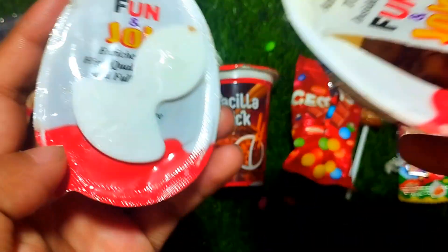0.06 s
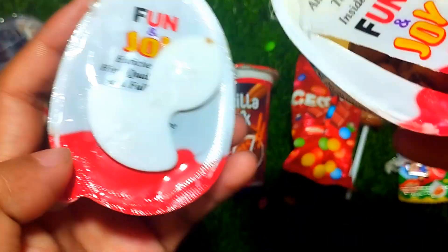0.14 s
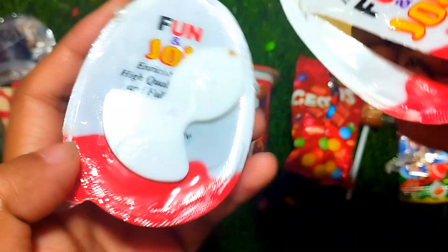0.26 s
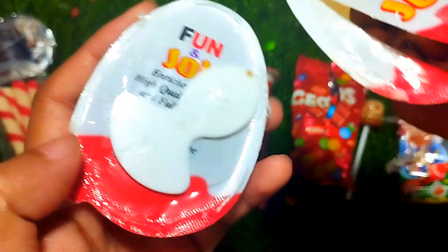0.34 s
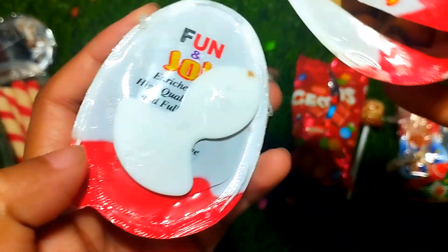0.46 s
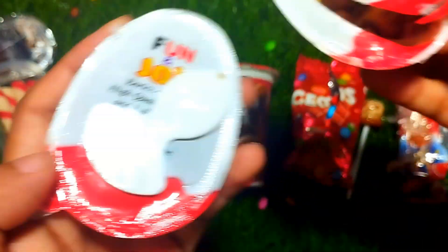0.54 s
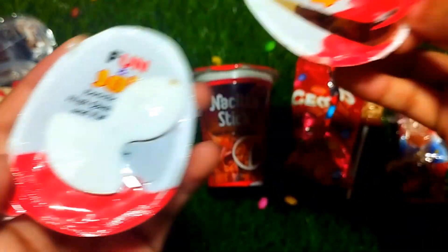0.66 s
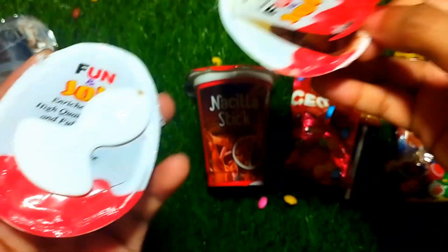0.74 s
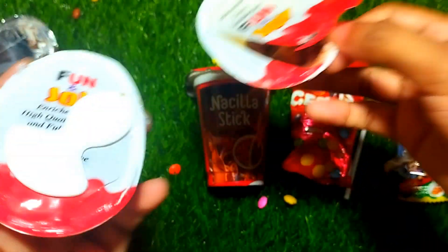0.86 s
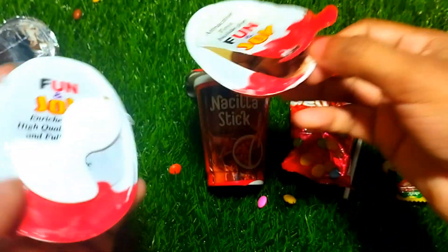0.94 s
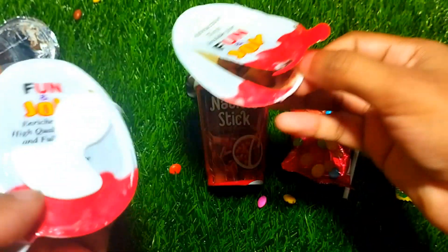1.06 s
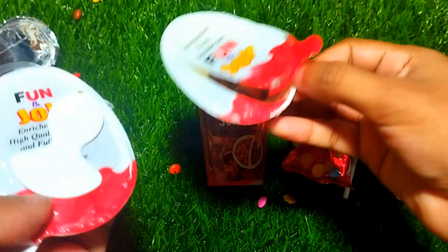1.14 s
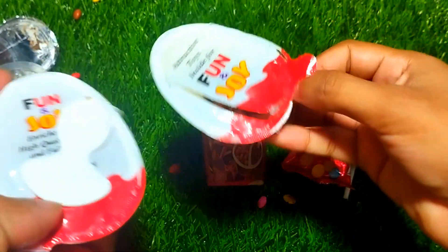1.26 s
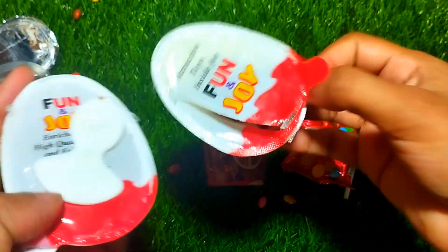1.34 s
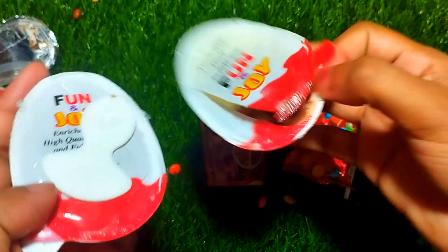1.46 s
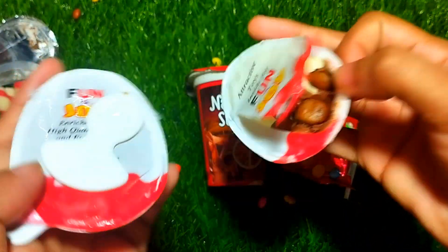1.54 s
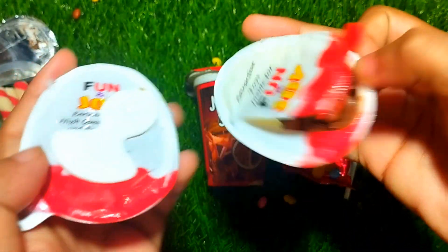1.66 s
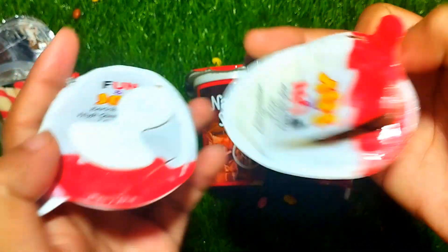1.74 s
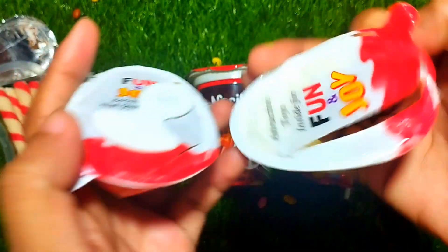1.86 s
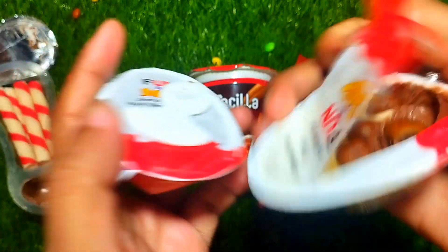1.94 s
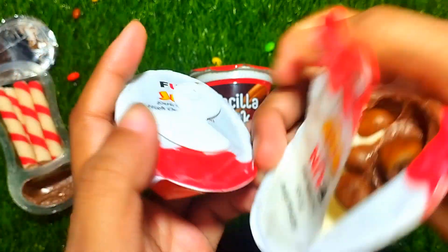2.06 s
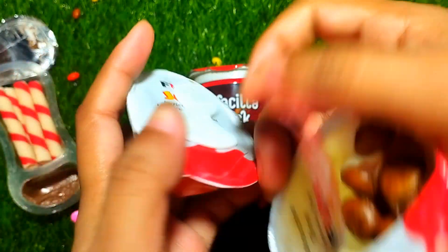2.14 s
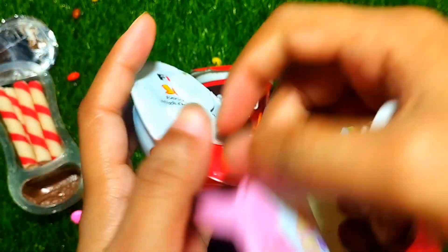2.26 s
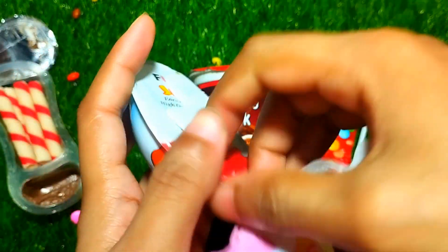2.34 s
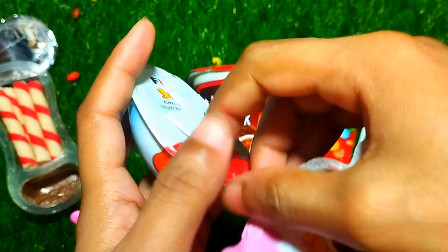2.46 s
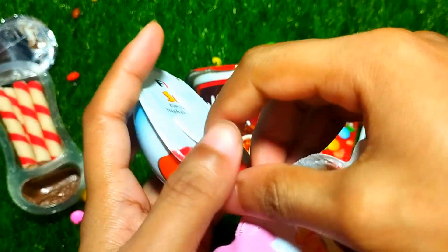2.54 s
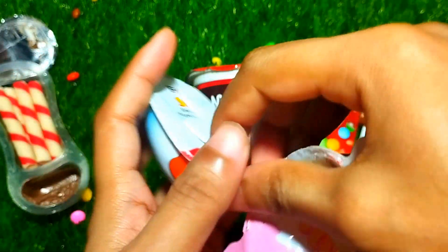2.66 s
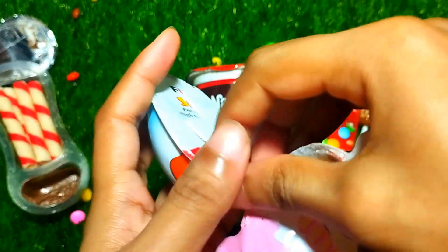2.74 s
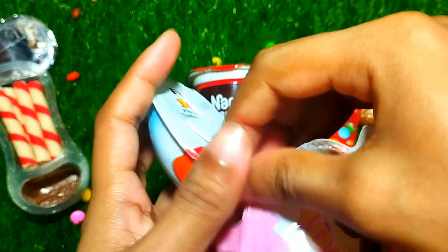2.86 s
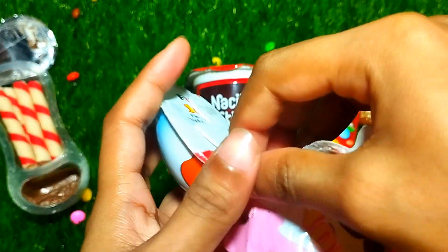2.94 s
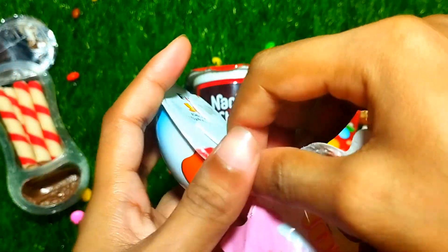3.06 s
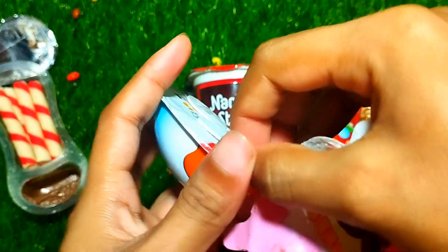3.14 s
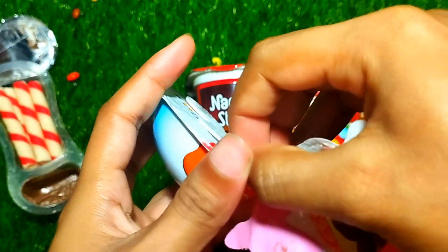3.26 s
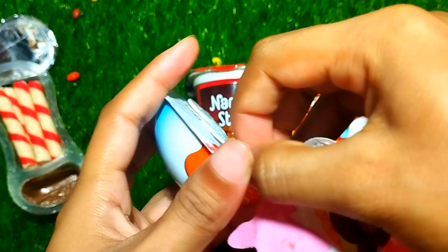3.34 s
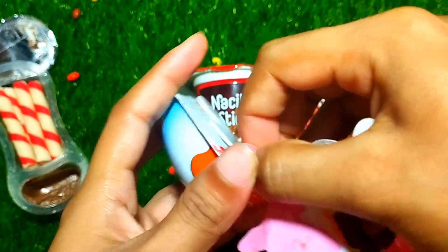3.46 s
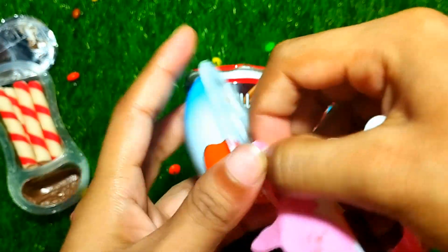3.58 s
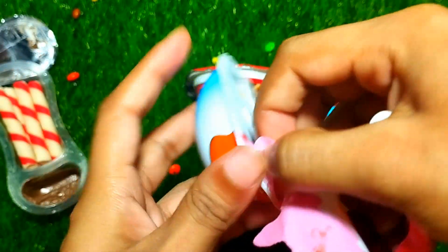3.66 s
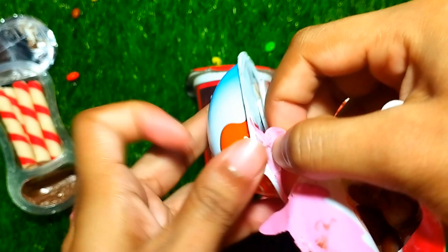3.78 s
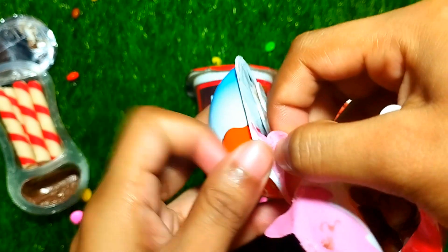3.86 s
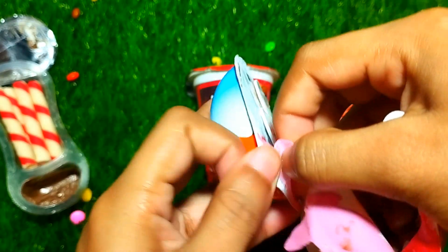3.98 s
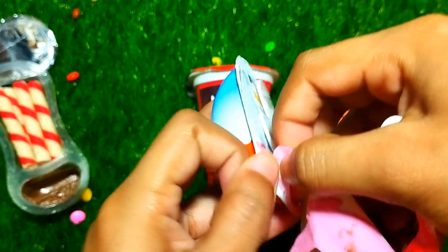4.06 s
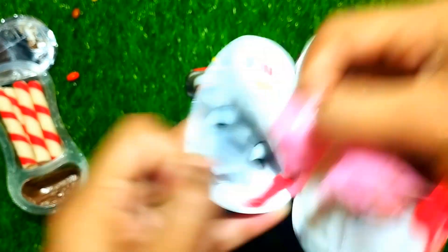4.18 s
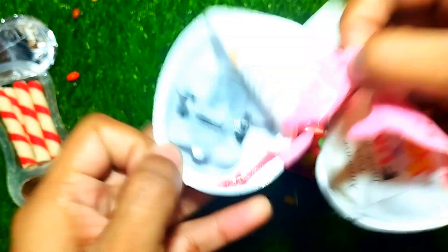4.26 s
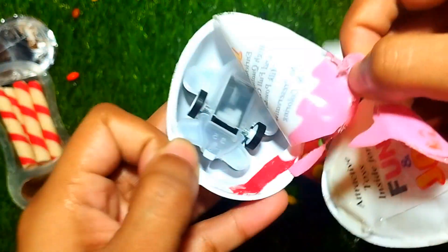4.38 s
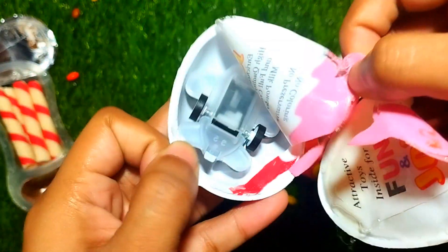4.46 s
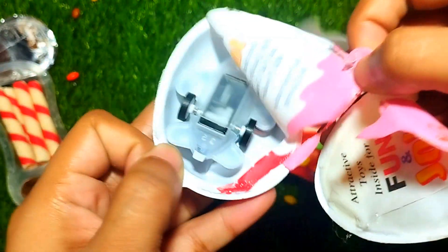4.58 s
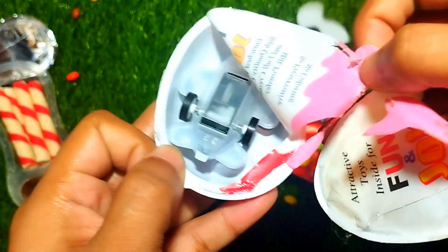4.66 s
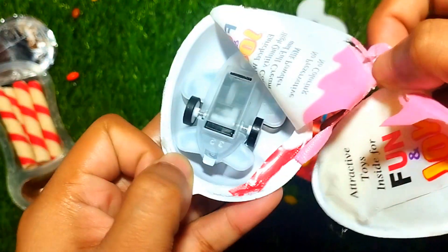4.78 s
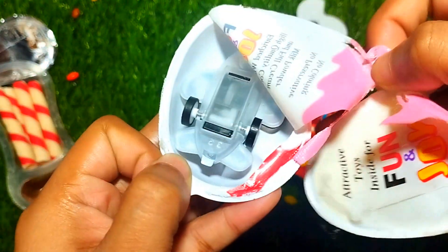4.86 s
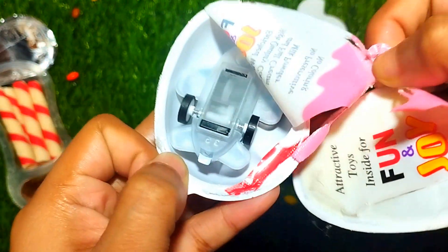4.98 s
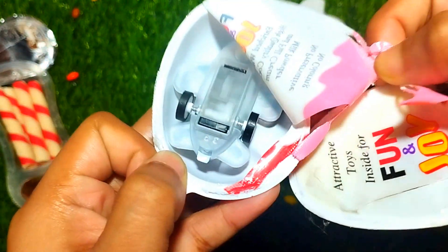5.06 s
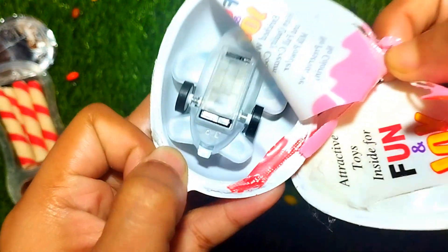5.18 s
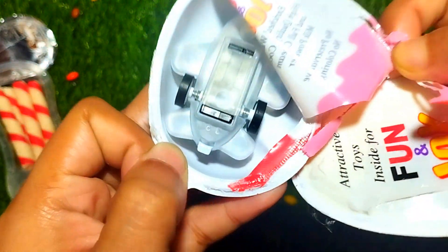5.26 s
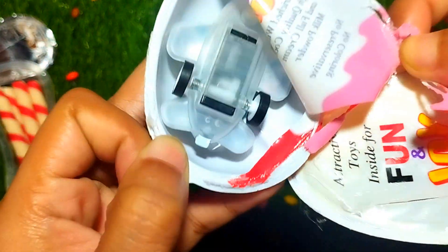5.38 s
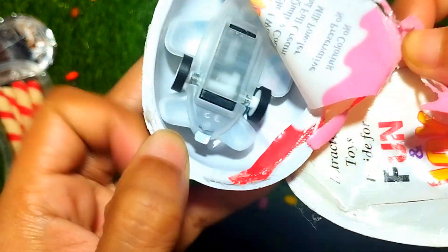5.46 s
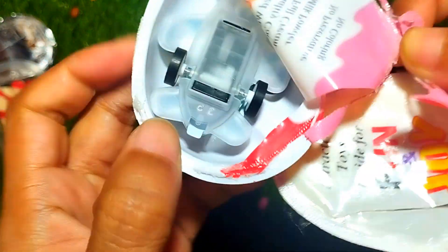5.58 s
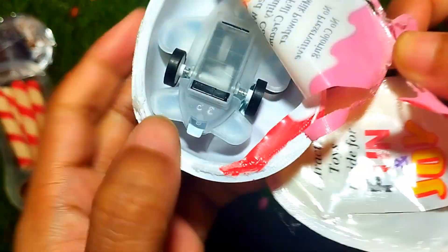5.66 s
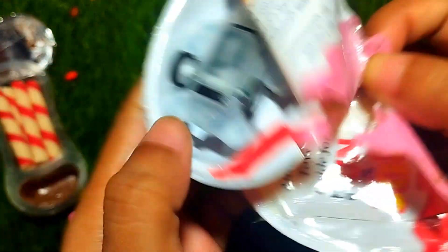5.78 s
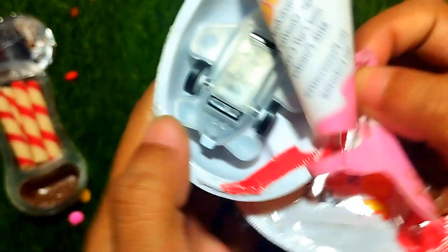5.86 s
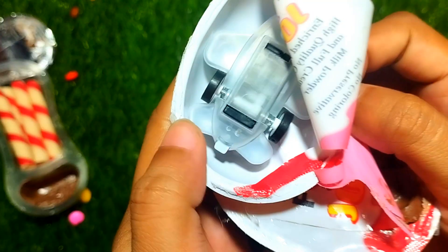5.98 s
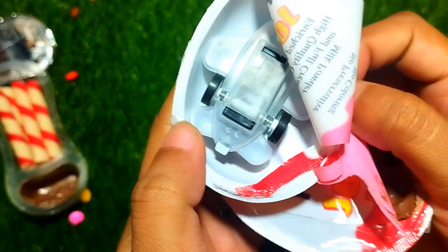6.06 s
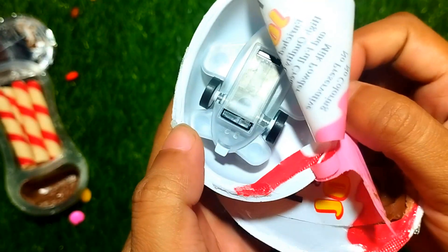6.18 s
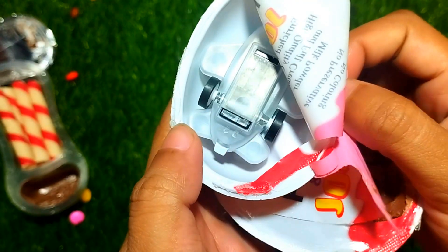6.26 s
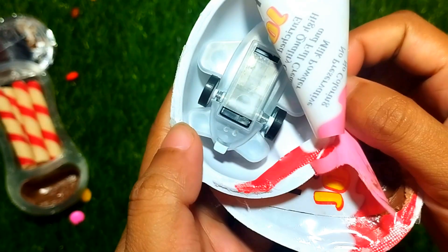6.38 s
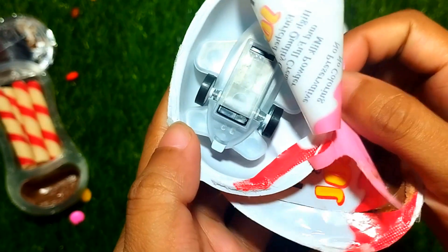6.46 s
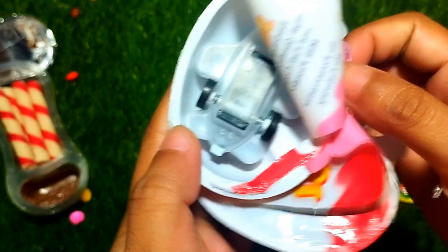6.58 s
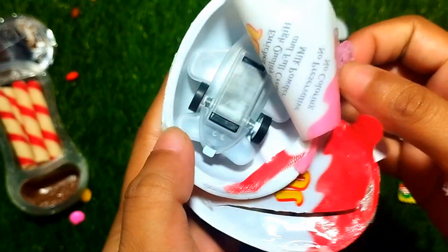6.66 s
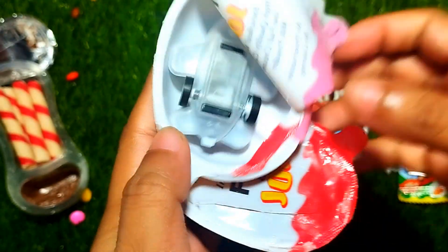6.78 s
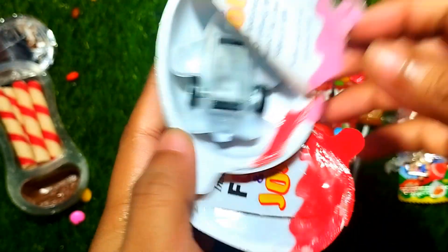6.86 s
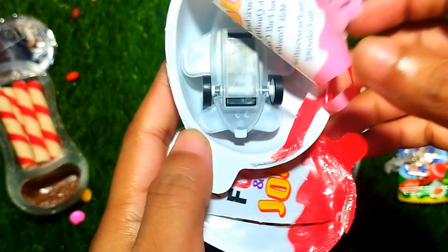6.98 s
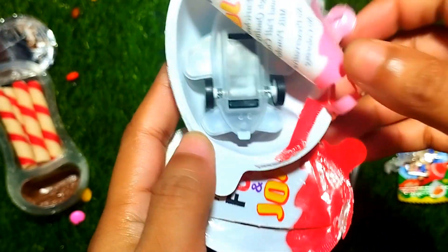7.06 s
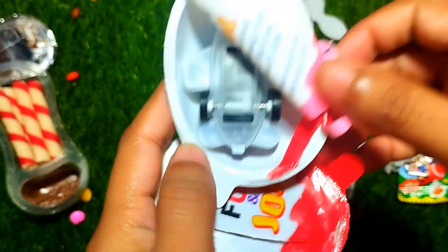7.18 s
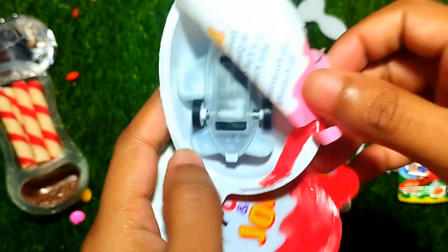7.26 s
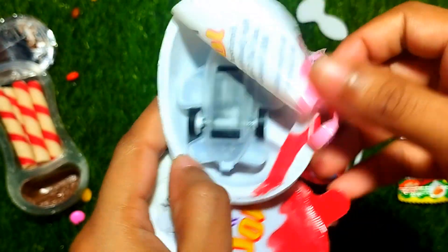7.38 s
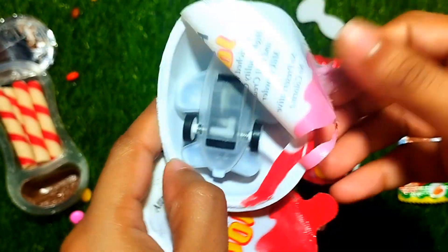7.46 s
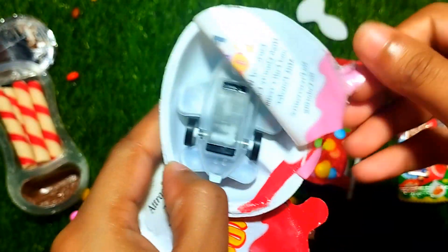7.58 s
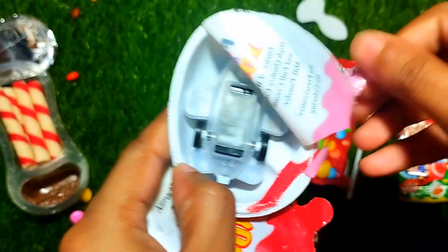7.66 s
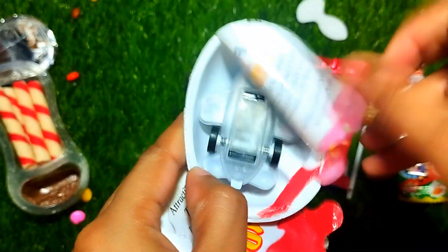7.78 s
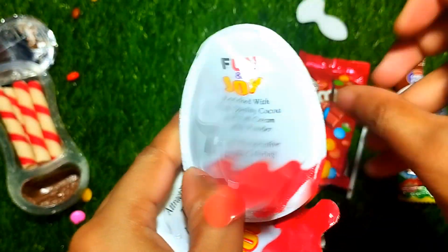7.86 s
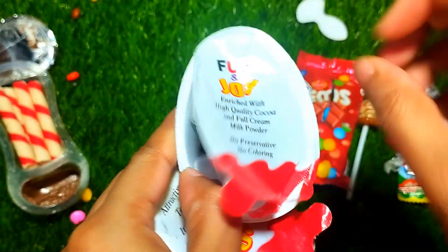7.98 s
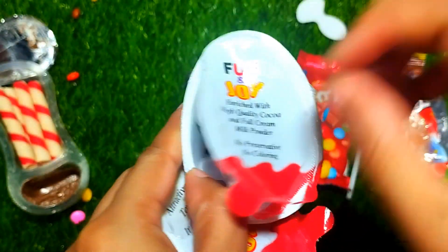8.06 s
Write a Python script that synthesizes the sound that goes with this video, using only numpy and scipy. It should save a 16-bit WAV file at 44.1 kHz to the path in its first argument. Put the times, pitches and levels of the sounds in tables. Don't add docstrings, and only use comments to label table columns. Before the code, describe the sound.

Close, nearly mono pickup in a small room: light plastic ticks, squeaky finger rubs and film crinkles, with a few bright isolated cracks. A rapid rip of the peeled lid is the loudest moment, just after the four-second mark. Irregular bursts of crackling follow, with brief quiet gaps. Faint far engine hum, low rumble and thin air hiss remain underneath, slightly gated in the treble.

```python
import sys
import numpy as np
from scipy import signal
from scipy.fft import rfft, irfft, next_fast_len
from scipy.io import wavfile
from scipy.ndimage import uniform_filter1d, map_coordinates

SR = 44100
rng = np.random.default_rng(int(sys.argv[2]) if len(sys.argv) > 2 else 0)


def undo_db(level):
    steps = np.asarray(level, float) / 20
    return 10 ** steps


def file_out(sig):
    cols = np.atleast_2d(sig).T
    lim = np.clip(cols, -1, 1)
    pcm = np.round(lim * 32767).astype(np.int16)
    wavfile.write(sys.argv[1], SR, pcm)


N = 358533


def unit(x):
    return x / np.sqrt(np.mean(x ** 2) + 1e-20)


def along(points, hz):
    f, v = np.transpose(points)
    return np.interp(np.log(hz + 1), np.log(f + 1), v)


def wobble(rate_hz):
    return map_coordinates(rng.standard_normal(int(N * rate_hz / SR) + 4), [np.arange(N) * rate_hz / SR])


def filtered(x, response):
    m = next_fast_len(N + SR // 2)
    return irfft(rfft(x, m) * response(np.fft.rfftfreq(m, 1 / SR)), m)[:N]


def coloured(spectrum):
    return unit(filtered(rng.standard_normal(N), lambda hz: undo_db(along(spectrum, hz))))


def resonances(modes):
    def response(f):
        total = 0
        for k, (centre_hz, width_hz, level_db) in enumerate(modes):
            damping = 1j * f * width_hz
            total = total + (-1) ** k * undo_db(level_db) * damping / (centre_hz ** 2 - f * f + damping)
        return total
    return response


def note(hz, width_hz):
    return lambda f: resonances([(hz, width_hz, 0)])(f) ** 2


def ringing(response):
    return irfft(response(np.fft.rfftfreq(2048, 1 / SR)))[:1024]


# start_s, peak_db, bright_db, pitch_hz
CREASES = [(0.255, -42.5, 0.5, 1600), (0.274, -59.5, 10.5, 2060), (1.387, -37.5, -4, 1970),
           (1.827, -41, -4.5, 1587), (1.87, -33.5, -16, 1620), (1.896, -30, -11, 1470),
           (1.938, -45, -7, 2730), (1.977, -41, 0.5, 1910), (2.015, -44, 2.5, 1890),
           (2.036, -54, 3.5, 1980), (2.083, -35, -11, 2630), (2.209, -33.5, -19.5, 2000),
           (2.354, -33.5, -16, 1860), (2.395, -28, -20, 1830), (2.432, -28.5, -43, 1650),
           (2.746, -35, -8.5, 1870), (2.77, -40.5, -18, 2650), (2.89, -37.5, -9.5, 1510),
           (3.329, -31, -8, 2140), (3.372, -28, -11.5, 2000), (3.43, -40.5, -6, 2000),
           (3.5, -48, -11, 2120), (3.611, -37.5, -3, 1340), (3.679, -26.5, -8.5, 2260),
           (3.764, -42, 1.5, 1210), (3.93, -37, -8.5, 1665),
           (3.255, -45.5, 0, 2000), (3.974, -38.5, -12.5, 1540), (4.593, -31, -17, 2500),
           (4.615, -34, -11, 1980), (4.662, -53.5, -9, 1620), (4.701, -40, -14, 1390),
           (4.771, -45.5, -20.5, 1323), (5.251, -74, -5, 1297), (5.442, -41.5, -10, 1780),
           (5.489, -44.5, -16, 2610), (5.532, -34, -10, 1820), (5.643, -31, -2, 2120),
           (5.689, -53.5, 6.5, 1780), (5.775, -36, -12, 2070), (5.8, -33, -8, 2000), (5.822, -29, -6, 2060),
           (5.853, -32, -4.5, 2320), (5.912, -23.5, -1, 2010), (5.936, -27, -1.5, 2080),
           (5.955, -35, -18, 1950), (5.986, -33, -18, 2090), (6.007, -28.5, -4.5, 2100),
           (6.439, -49.5, 0.5, 2130), (6.477, -34.5, -10.5, 2262), (6.547, -31.5, -30, 2160),
           (6.614, -35.5, -6, 2440), (6.63, -35.5, -1, 1940),
           (6.646, -41, 0.5, 1850), (6.654, -28, -6.5, 2100), (6.671, -28, -7, 1760),
           (6.7, -34.5, -5, 1690), (6.715, -58, -16, 1420), (6.775, -29, -3, 3650), (6.81, -31, -28, 2390),
           (6.871, -32, -10, 2000), (6.885, -29, -7.5, 2160), (6.912, -47, 6, 2800),
           (6.942, -24.5, -7.5, 3000), (6.99, -36, -9, 2840), (7.299, -37.5, -22.5, 1610),
           (7.33, -35.5, -4, 1580), (7.456, -27.5, -0.5, 2030), (7.466, -22, -13, 2080),
           (7.486, -22.5, -6, 1910), (7.506, -32, -10, 1570), (7.517, -41, -13, 1970),
           (7.604, -32, -13, 2340), (7.626, -32.5, -31, 2280), (7.656, -43, -2, 1770),
           (7.67, -29, -7.5, 1980), (7.684, -40, -22, 1990), (7.879, -24, -4, 1910), (7.916, -34, -7, 1750),
           (7.949, -31, -17.5, 1830), (8, -39.5, -19, 1910)]
# start_s, peak_db, bright_db, pitch_hz
TEAR = [(4.162, -33, -4, 2640), (4.189, -11, -10.5, 1750), (4.192, -18.5, -12.5, 1290),
        (4.21, -23, 2, 1650), (4.2205, -25.5, -7.5, 2500), (4.223, -18.5, 1.5, 2300),
        (4.2265, -20, -3, 1700), (4.2305, -7, -11.5, 1600), (4.234, -18.5, -0.5, 1700),
        (4.2402, -10, -9.5, 1840), (4.246, -17.5, -4.5, 1900), (4.2555, -21, -16, 1866),
        (4.26, -23, -12, 1950), (4.2636, -6.5, -11, 2050), (4.273, -13.5, -3.5, 2330),
        (4.277, -16, -6.5, 2050), (4.2815, -11, -11.5, 1900), (4.285, -11.5, -11, 2000),
        (4.29, -19, -13.5, 1898), (4.2945, -10, -12.5, 1875), (4.2985, -17.5, -8, 2000),
        (4.306, -16, -14, 2185), (4.309, -14.5, -12, 2150), (4.313, -11, -13.5, 2168),
        (4.317, -17, -10.5, 2150), (4.38, -33, -9, 1790), (4.438, -41, -8, 2580)]
# start_s, peak_db, bright_db, pitch_hz
LEADS = [
    (2.371, -39, -7.5, 2600),
    (4.187, -17.5, -2, 1020),
    (4.333, -19, -7.5, 2570),
    (5.544, -28, -8.5, 4300),
    (5.567, -23.5, -2, 1050),
    (1.058, -52, 1, 2130),
    (5.915, -33, -15.5, 396),
    (6.75, -34, -26.5, 330),
]
# start_s, peak_db, bright_db, pitch_hz
RIPS = [(0.307, -43, -28, 1680), (1.584, -39, -7, 1770), (1.772, -36.5, -5.5, 1480), (3.625, -31, -5, 1320),
        (4.539, -21.5, -11.5, 3005), (4.55, -30, -14.5, 1630), (4.561, -36, -9, 1550),
        (4.556, -29.5, -18, 900), (5.847, -36, -4, 2090), (5.895, -26.5, -7, 2190),
        (5.921, -27.5, -6, 2030), (6.541, -40, -12, 2050), (6.681, -32, -6, 1953),
        (6.749, -30.5, -5.5, 2040), (6.925, -31, -7, 2660), (7.49, -25.5, -4.5, 1972),
        (7.572, -35, -16, 2180), (7.868, -19, -7.5, 2220), (7.886, -24, -6.5, 1900)]
# start_s, peak_db, bright_db, pitch_hz, edge_db
CRACKS = [(1.004, -27.5, -5, 3940, -20), (1.455, -19.5, 1, 4050, -7), (2.384, -21, -13.5, 6870, -10.5),
          (2.838, -11, -8, 3650, -14.5), (2.912, -46, -13.5, 7180, 5.5), (3.03, -23.5, -18, 4020, -27.5),
          (3.293, -20, -12.5, 3990, -12), (3.345, -18, -10.5, 4330, -7.5),
          (3.556, -36.5, -10.5, 3850, -7.5), (4.338, -2, -8, 4480, -22.5), (4.828, -13.5, 0, 4330, -12.5),
          (5.564, -15, -8, 5350, -23), (6.12, -27, 1, 3060, -3), (6.463, -38.5, 3.5, 6360, -5)]
# start_s, peak_db, bright_db, pitch_hz
MORE_CREASES = [(0.3, -52, 6.5, 3600), (0.9995, -30, -4, 2130), (1.362, -52, -16, 1500), (2.828, -58, -17, 1900),
                (3.246, -57, -1, 2500), (3.268, -62, -2, 2500), (3.287, -41, -26, 1500), (3.417, -48, -12, 2000),
                (3.52, -54, -15, 1600), (3.633, -29.5, -2.5, 1900), (3.643, -33, -10.5, 2300),
                (3.713, -60, -1, 2400), (3.72, -59.5, 11.5, 2400), (3.737, -61, 0, 2200),
                (3.805, -47.5, 0.5, 2400), (3.922, -57, -17, 1500), (4.11, -68.5, 11.5, 2500),
                (4.335, -21, -7, 2400), (4.983, -56.5, -11, 2500), (5.254, -66.5, 8, 2500),
                (5.408, -48.5, -14, 2190), (5.435, -44.5, -12, 1800), (6.55, -37.5, -13, 2200),
                (6.69, -34, -18, 2050), (6.718, -42, -20, 1800), (6.762, -44, 4, 900), (6.838, -56, 6, 2490),
                (6.78, -43, -11, 2820),
                (5.553, -34.5, -1.5, 3800), (5.812, -37, -2, 2100), (5.995, -31.5, -7, 1940),
                   (6.036, -44, -2, 2500), (6.249, -41.5, -7, 2400), (8.053, -51, -14, 2700),
                   (6.337, -49, -2, 2400), (0.71, -51.5, -8.5, 1700), (0.57, -48, -14, 2000),
                   (4.545, -28.5, -13.5, 960), (7.84, -38, -19, 1900), (7.778, -46.5, -18, 1100),
                   (7.722, -49, -9, 2400), (7.19, -45.5, -5.5, 2100), (1.605, -32.5, -10, 1320),
                   (4.641, -29, -12, 1960), (4.645, -27, -16, 2000), (4.65, -27, -12, 2150),
                   (5.874, -36, -6, 1800), (5.884, -37, -5, 3000), (5.899, -24, -12, 2700),
                   (5.904, -30, -10, 2400), (5.917, -29, -12, 2100), (5.929, -29, -8, 2800),
                   (5.945, -30, -10, 2300), (5.957, -36, -3, 2600), (6.015, -36, -8, 2000), (6.509, -41, -9, 2300),
                   (6.521, -39, -12, 1850), (6.297, -48, -7, 2500), (8.2, -35, -5, 2100), (8.6, -41, -4, 2200),
                   (7.594, -39, -5, 2100), (7.64, -39, -6, 2300), (7.955, -48, 2.5, 2400), (7.861, -37, -3, 2100),
                   (5.969, -37, -3, 2000), (4.349, -34, -6, 2100), (6.087, -50, 0, 3500), (5.78, -36, -6, 2400),
                   (4.406, -42, -3, 2300), (4.425, -50, 5, 2500), (4.185, -28, -14, 1200)]


def snaps():
    SNAP_MS, SLIP_MS, RIP_MS, CRACK_MS = 1.97, 1.6, 9.1, 0.54
    OWN_Q, CRACK_Q, WALL_HZ, WALL_Q = 4.2, 6.9, 2080, 3.2
    CRACK_CLEAN = 1.8
    kinds = [(CREASES, SNAP_MS, 0, 0), (TEAR, SLIP_MS, -2.5, 6.5), (LEADS, SLIP_MS, 0, 6.5),
             (RIPS, RIP_MS, 0, 0), (CRACKS, CRACK_MS, -2.5, 0), (MORE_CREASES, SNAP_MS, 0, 0)]
    cup, foil, fine = ringing(hollow), ringing(film), ringing(sizzle)
    wall = ringing(note(WALL_HZ, WALL_HZ / WALL_Q))
    out, t = np.zeros(N + SR), np.arange(1536) / SR
    events = [(ms, cup_db, fine_db, *row) for rows, ms, cup_db, fine_db in kinds for row in rows]
    for ms, cup_db, extra_db, start_s, peak_db, bright_db, pitch_hz, *edge_db in events:
        is_crack = len(edge_db)
        if not is_crack:
            ms = ms * undo_db(-0.27 * (bright_db + 20.5))
        u = t / (np.clip(ms, 0.2, 20) * 0.00054)
        envelope = u ** 0.63 * np.exp(-u ** 0.8) + 0.05 * np.exp(-t / 0.005)
        lumps = undo_db(3.5 * rng.standard_normal(64).repeat(24))
        pushes = envelope * lumps * rng.standard_normal((5, len(t)))
        pushes[1:, 8] += CRACK_CLEAN * is_crack * np.abs(pushes[1:]).max(axis=1)

        own = ringing(note(pitch_hz, pitch_hz / (CRACK_Q if is_crack else OWN_Q)))
        own_db = -2 - 0.5 * is_crack + bright_db * (pitch_hz > 3000)
        if is_crack:
            fine_level_db = 9.5 + edge_db[0]
        else:
            fine_level_db = -1.5 + 1.82 * bright_db + extra_db
        bodies = [(cup, -5 + cup_db), (own, own_db), (foil, 4.5 + bright_db), (fine, fine_level_db)]
        if is_crack:
            bodies.append((wall, -4 - 0.19 * (bright_db + 10.5)))
        for push, (body, level_db) in zip(pushes, bodies):
            part = signal.fftconvolve(push, body)
            out[round(start_s * SR):][:len(part)] += undo_db(peak_db + level_db) * part / np.abs(part).max()
    return out[:N]


# centre_hz, width_hz, level_db
CUP = [(293, 140, -13.5), (1070, 586, -9.5), (1567, 630, -5), (2024, 690, -6.5)]


def hollow(hz):
    return resonances(CUP)(hz) / (1 + 1j * hz / 3600) ** 3


# centre_hz, width_hz, level_db
FILM = [(2650, 550, 3), (4300, 800, -1.5), (5610, 870, -5), (6870, 1200, -8)]


def film(hz):
    return resonances(FILM)(hz) * (1j * hz / (2300 + 1j * hz)) ** 3


# centre_hz, width_hz, level_db
SIZZLE = [(9000, 2600, 4), (12370, 1200, 0.5), (15000, 3100, 0)]


def sizzle(hz):
    return resonances(SIZZLE)(hz)


def grains(rate_hz, spread_db, smooth, clump_db):
    chance = rate_hz / SR * undo_db(clump_db * wobble(50))
    size = undo_db(spread_db * np.minimum(rng.exponential(size=N), 3.5))
    slips = (rng.random(N) < chance) * size * rng.standard_normal(N)
    return unit(unit(slips) + smooth * rng.standard_normal(N))


# start_s, crest_s, end_s, rub_db, crinkle_over_rub_db
STROKES = [(0, 0.07, 0.28, -59.5, -48), (0.29, 0.319, 0.41, -49, -5), (0.62, 0.694, 0.72, -58, -20),
           (0.99, 1.03, 2, -70, -5.5), (1.571, 1.599, 1.65, -40.5, -7.5), (1.757, 1.764, 2.03, -54, -7.5),
           (1.92, 2.127, 2.19, -57.5, -5.5), (2.145, 2.402, 2.52, -61, -18), (2.495, 2.524, 2.76, -46, -18),
           (2.568, 2.695, 2.7, -56, -18), (3.597, 3.605, 3.84, -49, -6), (3.676, 3.686, 5.2, -93, -27),
           (3.88, 4.029, 4.1, -58.5, -8.5), (4.211, 4.238, 4.3, -23.5, -6.5),
           (4.244, 4.314, 4.328, -32, 3.5), (4.326, 4.351, 4.46, -49, -10), (4.538, 4.542, 4.63, -32.5, -7),
           (5.3, 5.49, 7.4, -75.5, -5), (5.754, 5.935, 6.02, -45.5, 0.5), (6.11, 6.234, 6.5, -61.5, -5),
           (6.458, 6.494, 6.95, -56, -4.5), (6.606, 6.66, 6.71, -42, -4.5), (7.044, 7.3, 7.85, -56.5, -9.5),
           (7.4, 7.46, 7.8, -50.5, -5), (7.814, 7.865, 7.96, -52.5, -7)]
# start_s, crest_s, end_s, rub_db, crinkle_over_rub_db
SHIFTS = [(0.184, 0.257, 0.55, -72, -2.5), (0.44, 0.51, 0.6, -68.5, -19), (.74, .9, 1.9, -77, -4.5),
          (2.195, 2.31, 2.4, -68, -2.5), (2.836, 2.864, 3.03, -56.5, -9), (3.294, 3.34, 3.5, -63.5, -3),
          (4.588, 4.642, 4.79, -51, -12), (5.007, 5.08, 4.97, -71.5, -6), (5.214, 5.255, 5.29, -73.5, -2),
          (6.73, 6.755, 7.08, -60, -2), (6.9, 6.935, 7.02, -60, -4), (0.3, 0.31, 0.38, -52, -12)]


def handling():
    SLACK_HZ, TIGHT_HZ, SQUEAK_WIDTH_HZ = 1800, 2000, 200
    GRIP_DB, GRIP_FILM_DB = -70.5, -74.5
    BELLY_HZ, BELLY_WIDTH_HZ, BELLY_DB = 1050, 560, -9
    t = np.arange(0, N + 32, 32) / SR
    rows, n = np.array(STROKES + SHIFTS), len(STROKES)
    rub_db, crinkle_db = rows[:, 3], rows[:, 3] + rows[:, 4]
    press = np.array([np.interp(t, row[:3], [0, 1, 0]) for row in rows]) ** 0.99

    def spread(gain):
        return np.interp(np.arange(N) / SR, t, gain)

    rub_gain = undo_db(GRIP_DB + 2.7 * wobble(2.3)) + spread(undo_db(rub_db) @ press)
    squeak_amp = undo_db(rub_db - 0.36 * (np.maximum(rows[:, 4], -18) + 10.5))
    tight_gain = spread(squeak_amp @ press ** 2)
    slack_gain = spread(squeak_amp @ (press - press ** 2))
    crinkle_gain = spread(undo_db(crinkle_db[:n]) @ press[:n])
    creep_gain = undo_db(GRIP_FILM_DB + 2.1 * wobble(6.2)) + spread(undo_db(crinkle_db[n:]) @ press[n:])

    slips = grains(rate_hz=880, spread_db=3, smooth=0.3, clump_db=7.5)
    skin = slips + grains(rate_hz=3800, spread_db=-3.5, smooth=0.78, clump_db=8)
    glide = grains(rate_hz=2800, spread_db=4, smooth=0.5, clump_db=4)

    rub = unit(filtered(skin, lambda hz: hollow(hz) * np.abs(hollow(hz)) ** 0.41))
    slack = unit(filtered(glide, note(SLACK_HZ, SQUEAK_WIDTH_HZ)))
    tight = unit(filtered(glide, note(TIGHT_HZ, SQUEAK_WIDTH_HZ)))
    squeak = tight_gain * tight + slack_gain * slack

    def foil(hz):
        return film(hz) + undo_db(-18.5) * sizzle(hz)

    crinkle = unit(filtered(slips, foil))
    brush = unit(filtered(glide + rng.standard_normal(N), foil))
    belly = unit(filtered(slips, note(BELLY_HZ, BELLY_WIDTH_HZ)))
    film_sound = undo_db(2.5) * creep_gain * brush + crinkle_gain * (undo_db(1.0) * crinkle + undo_db(BELLY_DB) * belly)
    return undo_db(-6) * rub_gain * rub + undo_db(-3) * squeak + film_sound


# freq_hz, t60_s
ROOM = [(500, 0.29), (2000, 0.14), (6000, 0.13), (14000, 0.09)]


def room(x):
    out, step = np.zeros(N + SR), SR // 4
    for start in range(0, N, step):
        hz, t, z = signal.stft(rng.standard_normal(SR // 3), SR, nperseg=256)
        decay = undo_db(-60 * t / along(ROOM, hz)[:, None])
        tail = signal.istft(z * decay, SR, nperseg=256)[1]
        wet = signal.fftconvolve(x[start:start + step], tail / np.linalg.norm(tail))
        out[start + 100:][:len(wet)] += wet
    return out[:N]


# centre_hz, width_hz, level_db, start_s, end_s
ENGINES = [
    (79.97, 5, -42, 0, 8.2),
    (98.03, 6, -44.5, 0, 5),
    (145.9, 6, -53, 2.5, 8.2),
    (170.96, 6.1, -49, 0, 2.7),
    (195.1, 7, -51, 0, 4.1),
    (200, 7.6, -54, 5.5, 6.72),
    (284.9, 5, -63, 0, 2.4),
    (292, 5, -63, 5.5, 6.1),
    (250, 6, -60.5, 7.2, 8.2),
]


def engines():
    FADE_S = 0.22
    t, out = np.arange(N) / SR, np.zeros(N)
    for hz, width_hz, level_db, start_s, end_s in ENGINES:
        passing = np.clip(np.minimum(t - start_s, end_s - t) / FADE_S + 1, 0, 1)
        hum = unit(filtered(rng.standard_normal(N), note(hz, width_hz)))
        out += undo_db(level_db + 2.5 * wobble(2.5)) * passing * hum
    return out


# time_s, level_db
DRONE = [(0.0, -30), (0.02, -31.5), (0.18, -34.5), (1.88, -32.5), (2.97, -36), (3.03, -33), (4.23, -39),
         (4.57, -36), (4.8, -36.5), (5.2, -39), (8.13, -35.5)]
# centre_hz, width_hz, level_db
LOW = [(13.75, 5.3, 4), (28, 8.5, 1), (62, 22, -5.5), (80.7, 9, 0.5), (100.4, 11.5, 0.5)]
# freq_hz, density_db
UPPER = [(100, -35), (128, -6.5), (200, -7.5), (235, -16), (310, -22.5), (500, -21.5), (900, -33),
         (2000, -120)]
# centre_hz, half_width_hz, height_db
HUMPS = [(140, 12, 3), (165, 8, 2), (193.1, 14, 7.86), (271, 17, 6), (385, 15, 4)]
# freq_hz, density_db
HISS = [(400, -11), (800, 9), (2000, -0.5), (5000, -10.5), (9000, -12.5), (16000, -21)]


def background():
    time_s, level_db = np.transpose(DRONE)
    low_db = np.interp(np.arange(N) / SR, time_s, level_db)

    def low_modes(hz):
        return resonances(LOW)(hz) / (1 + (hz / 118) ** 8)

    def humps(hz):
        return undo_db(sum(db / (1 + ((hz - c) / w) ** 2) for c, w, db in HUMPS))

    low = unit(filtered(rng.standard_normal(N), low_modes))
    upper = unit(filtered(coloured(UPPER), humps))
    low_gain = undo_db(low_db + 0.93 + 0.27 * wobble(0.65))
    upper_db = -47.5 + 0.97 * (low_db - low_db.mean()) + 0.61 * wobble(4.9)
    return low_gain * low + undo_db(upper_db) * upper + undo_db(-67.0) * coloured(HISS)


def scene():
    near = snaps() + handling()
    mono = near + undo_db(-12.5) * room(near) + background() + engines()
    return np.array([mono, mono])


# freq_hz, threshold_db
DROPOUT_FLOOR = [(1000, -100), (2000, -86.5), (3500, -82.5), (6000, -81.5), (9000, -81), (12000, -79), (15700, -78),
                 (16100, -50)]
# centre_s, half_length_s, shift_db
FLOOR_SHIFTS = [(0.16, 0.02, 6.5), (0.55, 0.15, 5.5), (1.08, 0.05, -4), (1.337, 0.028, 8), (1.43, 0.015, 12),
                (1.711, 0.03, 13), (2.48, 0.032, 8), (2.62, 0.08, 0), (3, 0.035, 7.5), (3.126, 0.035, 14),
                (3.227, 0.02, 13), (3.5, 0.051, 6), (3.87, 0.04, 5.5), (4.512, 0.02, 8),
                (4.814, 0.012, 15.5), (4.92, 0.031, -13), (5.051, 0.035, -15), (5.149, 0.06, 5),
                (5.25, 0.028, -21), (5.32, 0.04, 7.5), (7.1, 0.048, -3.5), (6.12, 0.023, 2.5),
                (5.7, 0.038, -14), (6.383, 0.04, -12), (6.586, 0.012, 6), (2.78, 0.03, -8), (8.07, 0.03, 5),
                (6.52, 0.05, -6), (6.85, 0.06, -6)]


def band_dropouts(x):
    TOP_HZ, BLUR_DB, BLUR_FROM_HZ = 16600, -44, 700
    hz, t, z = signal.stft(x, SR, nperseg=1536)
    bins = z[:-1]
    power = 2 * (np.abs(bins.reshape(64, 12, -1)) ** 2).sum(axis=1)
    drift_db = 2.2 * wobble(6.2)[np.minimum(t * SR, N - 1).astype(int)]
    for centre_s, half_s, shift_db in FLOOR_SHIFTS:
        drift_db = drift_db + shift_db * np.exp(-((t - centre_s) / half_s) ** 4)
    patch_db = 6 * uniform_filter1d(rng.standard_normal(power.shape), size=3, axis=1)
    keep = power > undo_db(along(DROPOUT_FLOOR, hz[6::12])[:, None] + drift_db + patch_db) ** 2
    phase = np.exp(2j * np.pi * rng.random(bins.shape))
    blur = undo_db(BLUR_DB) * np.sqrt(np.repeat(power, 12, axis=0)) * phase
    z[:-1] = (bins + blur * (hz[:-1, None] > BLUR_FROM_HZ)) * np.repeat(keep, 12, axis=0)
    return signal.istft(z * (hz < TOP_HZ)[:, None], SR, nperseg=1536)[1][:N]


# freq_hz, level_under_sound_db
APART = [(60, -100), (230, -94), (380, -39), (700, -31), (2380, -39.5), (4400, -24.5), (8120, -21.5),
         (15000, -17)]


def channel_difference(mid):
    scramble = np.exp(2j * np.pi * wobble(60))
    turned = np.real(signal.hilbert(mid, next_fast_len(N))[:N] * scramble)
    return filtered(turned, lambda hz: undo_db(along(APART, hz) + 1 - 10 * (hz < 200)))


def low_pass(x):
    return signal.sosfilt(signal.butter(12, 17040, fs=SR, output="sos"), x)


def record(dry):
    mid = band_dropouts(dry[0])
    side = channel_difference(mid)
    return low_pass(np.array([mid + side, mid - side]))


dry = scene()
out = record(dry)
file_out(out)
```